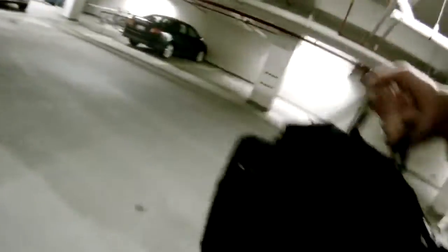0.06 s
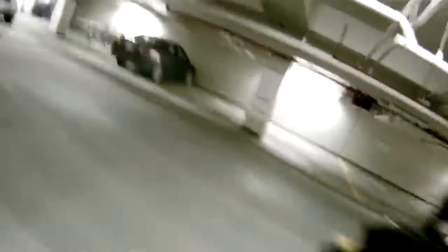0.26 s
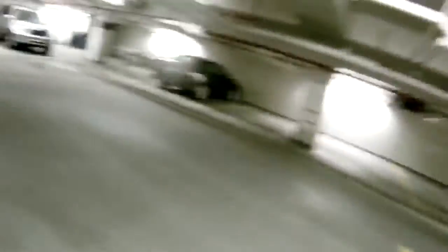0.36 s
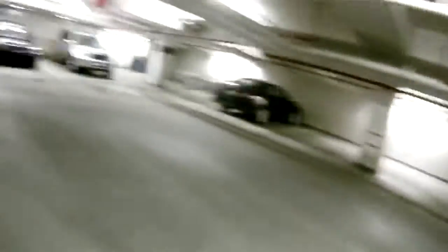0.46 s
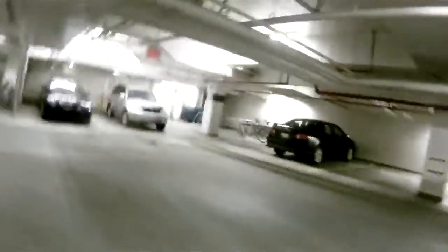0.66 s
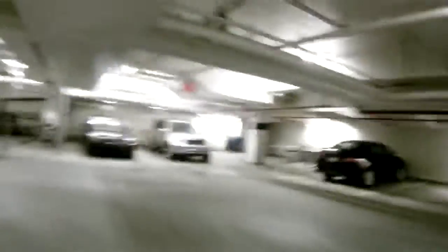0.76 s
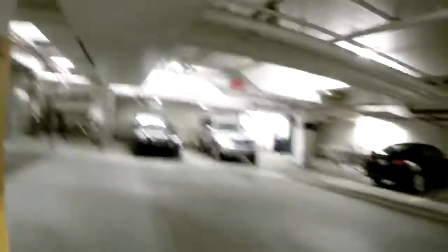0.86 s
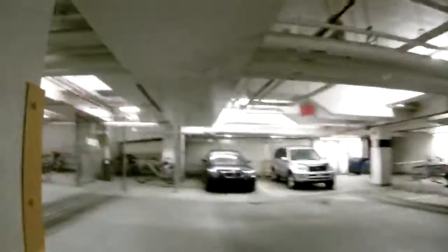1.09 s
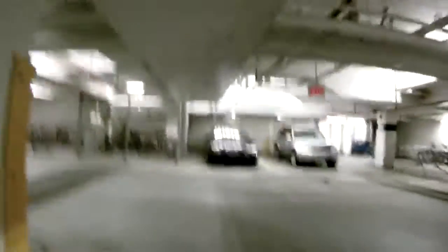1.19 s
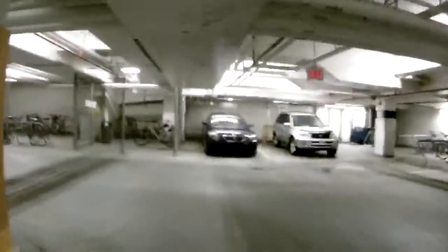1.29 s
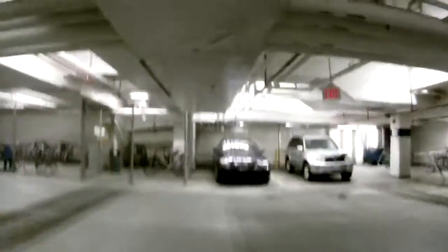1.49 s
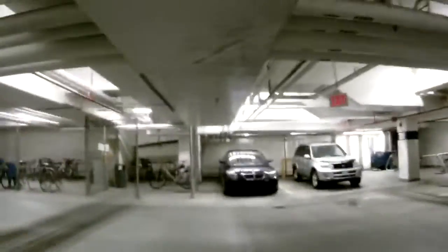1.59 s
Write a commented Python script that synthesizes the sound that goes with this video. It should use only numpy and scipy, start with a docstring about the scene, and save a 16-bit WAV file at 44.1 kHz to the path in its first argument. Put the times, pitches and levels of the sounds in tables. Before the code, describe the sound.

Close handling clicks rattle briefly on a plastic camera case, followed by soft cloth swishes, a few light ticks and a hand rubbing near the microphone. Behind them is the low airy hum of a concrete parking garage.

```python
"""Concrete parking garage: a bag is put aside and a hand-held camera is swung round.
Sharp clicks and small ticks ring the modes of the camera's plastic case. Fabric swishes past,
and a hand rubs the case in stick-slip and bumps it. Ventilation murmurs behind, air noise with
fan tones, and the hall answers the clicks and swishes faintly."""
import sys
import numpy as np
from scipy import signal
from scipy.fft import rfft, irfft, next_fast_len
from scipy.io import wavfile
from scipy.ndimage import map_coordinates

SR = 44100
rng = np.random.default_rng(int(sys.argv[2]) if len(sys.argv) > 2 else 0)


def generate_wav(sig):
    """Save sig (samples, or channels by samples) to the path in sys.argv[1] as 16-bit PCM at SR."""
    pcm = np.round(np.clip(np.atleast_2d(sig).T, -1, 1) * 32767).astype(np.int16)
    wavfile.write(sys.argv[1], SR, pcm)


N = 72765
TIME_S = np.arange(N) / SR

# Case modes: f/Hz, width/Hz, level/dB
CASE_MODES = [(882, 105, -5.5), (1172, 129, -1.5), (1690, 184, -0.5), (2088, 236, 1), (2312, 153, -2),
              (2890, 83, -7.5), (3290, 127, -9), (3680, 190, -17), (4700, 660, -52), (8600, 500, -18.5),
              (9744, 280, -9.5), (14220, 410, -14)]
# Contacts; where each lands sets its drive per band:
# t/s, relative level/dB, knock/dB, hollow/dB, snap/dB, edge/dB, sparkle/dB, ring-time factor, thump/dB
CONTACTS = [ (0.2378, -11.5, 2, 7, -0.5, -16.5, -3.5, 0.76, -24),
            (0.2496, -13, -7.5, -4, 2, -9, -1, 0.72, -15), (0.2526, -19, -8, 7, 8, 0, 2.5, 1.5, -29),
            (0.2930, -10.5, -2, 4, -0.5, 2.5, -1, 1.23, -23), (0.3299, 0, 3, 7, 7, 1.5, 4.5, 1.15, -4.5),
            (0.3627, -12.5, -3, -5, 1, -13, -4, 1, -15), (0.398, -25.5, 16, 8, -1, -22, -3, 1.8, 10),
            (0.4433, 0, 0.5, -4.5, -8.5, -11.5, -6.5, 1.02, -19),
            (0.4483, -2.5, -0.5, 2.5, -7, -9, -6, 0.75, -10),
            (0.4753, -18, 18.5, -2, -2, -21, -5.5, 1.34, -28),
            (0.4818, -25.5, 20.5, 12.5, -6, -22, -3, 1.17, 5), (0.8280, -33.5, 1, 2, -6, -12, -6, 1.4, -16),
            (0.9066, -37.5, 5, 7, 3, -6, -0.5, 1.3, -11), (0.969, -27.5, 2, -3, -10, -23, -9, 1.3497, 0),
            (0.9960, -33, -6, -5, -1, 3, 1, 1.3, -8), (1.4050, -33, 4, 3, -1, -2, -2.5, 1.35, -15),
            (1.4270, -29, 8, -0.5, -9, -10.5, -7, 0.64, 2), (1.4872, -33, 11.5, 10, 11, -2.5, 3, 1.28, 10),
            (1.4920, -27.5, -11, 2, 1, 11, 3, 1.87, -20), ]
CLICK_GAIN_DB, CLICK_FADE_S = 23, 0.047
THUMP_GAIN_DB, THUMP_HZ, THUMP_WIDTH_HZ, THUMP_LOWPASS_HZ = -4, 159, 720, 730
SLIP_DB, SLIP_T60_S, SLIP_HIGHPASS_HZ = -14.5, 0.014, 2130


def case_clicks(size=4096):
    """A sharp push and tiny slips ring the case over a dull thump; each click fades out quickly."""
    out = np.zeros(N + size)
    t, f = np.arange(size) / SR, np.fft.rfftfreq(size, 1 / SR)
    thump_lowpass = minimum_phase(1 / (1 + (f / THUMP_LOWPASS_HZ) ** 2), size)
    thump = resonance(f, THUMP_HZ, THUMP_WIDTH_HZ) * thump_lowpass
    slip_highpass = (1j * f / (SLIP_HIGHPASS_HZ + 1j * f)) ** 2
    fade = np.exp(-(2 * t / CLICK_FADE_S) ** 2)
    for start_s, db, knock, hollow, snap, edge, sparkle, ring, thump_db in CONTACTS:
        slips = amp(SLIP_DB - 60 * t / SLIP_T60_S) * rng.standard_normal(size)
        force = 1 + slip_highpass * rfft(slips)
        mode_power = sum(abs(amp(mode_db) * resonance(f, hz, width_hz / ring)) ** 2
                         for hz, width_hz, mode_db in CASE_MODES)
        drive_hz_db = [(880, knock), (1200, hollow), (1750, 0), (2200, snap),
                       (4200, edge), (7500, edge), (9800, sparkle)]
        case = minimum_phase(np.sqrt(mode_power) * amp(log_interp(drive_hz_db, f)), size)
        click = irfft(force * case + amp(THUMP_GAIN_DB + thump_db) * thump)
        out[round(start_s * SR):][:size] += amp(CLICK_GAIN_DB + db) * fade * click
    return out[:N]


# Cloth swish and drag rumble spectra: f/Hz, relative density/dB
CLOTH_SPECTRUM = [(100, 6.5), (300, -15), (650, -12), (860, 3), (1200, -8.5), (1450, -7.5), (1800, 6),
                  (2100, 2.5), (2450, -4), (3100, 7), (3600, -7), (4100, -5.5), (5200, -24.5),
                  (7000, -22.5), (8200, -11.5), (8900, -2.5), (9500, -14), (10300, -11.5), (11300, -26),
                  (13200, -17), (14000, -24), (14600, -5), (15200, -14)]
DRAG_SPECTRUM = [(40, -15), (100, -1.5), (150, 1), (200, -10), (320, -21), (800, -69)]
# Cloth strokes: start/s, peak/s, end/s, peak level/dB, hiss boost/dB, relative drag/dB
STROKES = [(0.49, 0.506, .60, -43, -9, -23), (0.583, 0.674, 0.73, -42.5, 3.5, -2.5),
           (0.7, 0.766, .82, -36.5, 7, -14), (1.212, 1.259, 1.291, -41.5, 16.5, -30),
           (1.234, 1.303, 1.356, -40.5, 5, -11.5)]
STROKE_FALL_DB = 19.5  # peak to start or end
HISS_HZ, HISS_WIDTH_HZ = 5830, 1240


def fabric_swishes():
    """Cloth drags over the case: each stroke swells and fades, a grainy hiss with a soft rumble."""
    out = np.zeros(N)
    for start_s, peak_s, end_s, db, hiss_db, drag_db in STROKES:
        off_peak = np.maximum((peak_s - TIME_S) / (peak_s - start_s),
                              (TIME_S - peak_s) / (end_s - peak_s))
        hiss = filtered(noise(CLOTH_SPECTRUM), lambda f: amp(hiss_db * bell(f, HISS_HZ, HISS_WIDTH_HZ)))
        swish = stick_slip(hiss) + amp(drag_db) * noise(DRAG_SPECTRUM)
        out += amp(db - STROKE_FALL_DB * off_peak) * swish
    return out


def stick_slip(x, depth_db=2, rate_hz=200):
    """Rubbing surfaces catch and release, so the level flickers; rms 1."""
    return unit_rms(x * amp(depth_db * wobble(rate_hz)))


# Skin-on-plastic and sway spectra: f/Hz, relative density/dB
RUB_SPECTRUM = [(100, -9), (400, -9), (680, -8), (820, -3.5), (1180, 1.5), (1450, -7.5), (1750, 4),
                (2200, -0.5), (2550, -15.5), (3100, -13), (4500, -20), (7500, -23), (9000, -25),
                (10100, -11.5), (11200, -23), (13200, -25), (14000, -11), (15300, -43)]
RUMBLE_SPECTRUM = [(12, -8), (30, 0), (50, -5), (75, -14), (120, -12), (200, -22), (400, -40), (1000, -80)]
# Rub and sway envelopes: t/s, level/dB
RUB_LEVELS = [(0, -74), (.22, -58.5), (.36, -55.5), (.42, -71), (.49, -45.5), (.58, -61.5), (.94, -60.5),
              (1.0, -50), (1.06, -57), (1.095, -45.5), (1.125, -54), (1.21, -70), (1.39, -65), (1.5, -55),
              (1.535, -43), (1.56, -42), (1.6, -41), (1.64, -37)]
RUMBLE_LEVELS = [(0, -59), (.3, -59), (.4, -44), (.45, -41.5), (.5, -51), (.55, -47), (.62, -53), (.7, -63),
                 (.8, -52.5), (.9, -53), (.96, -45), (1.08, -58), (1.3, -51), (1.5, -55.5), (1.65, -65)]


def hand_rub():
    """Skin sticks and slips on the case; the hand's sway rumbles in the microphone."""
    rub = envelope(RUB_LEVELS) * stick_slip(noise(RUB_SPECTRUM))
    rumble = envelope(RUMBLE_LEVELS) * noise(RUMBLE_SPECTRUM)
    return rub + rumble


# Hand and bag bumps: t/s, envelope peak/dB, f/Hz
SOFT_CONTACTS = [(0.244, -49, 44), (0.48, -38, 29.3), (0.689, -35, 50.6), (.762, -37, 121),
                 (0.847, -34, 26.6), (0.951, -37.5, 45)]
SWING_CYCLES = 0.79


def soft_bumps():
    """Each soft contact swings the camera about once."""
    out = np.zeros(N)
    for start_s, db, hz in SOFT_CONTACTS:
        cycles = np.maximum(TIME_S - start_s, 0) * hz
        rise = 2 * cycles / SWING_CYCLES
        out += amp(db) * rise * np.exp(1 - rise) * np.sin(2 * np.pi * cycles)
    return out


# Air noise: f/Hz, relative density/dB
AIR_SPECTRUM = [(30, 8.5), (100, 1.5), (220, -6.5), (330, 1), (480, -3.5), (750, -7), (1000, -3), (1170, 1),
                (1350, -8.5), (1550, -13.5), (2100, -2.5), (2700, -13.5), (3300, -13), (3900, -23),
                (5200, -25.5), (8000, -28.5), (9000, -21.5), (10000, -18), (11300, -22), (13000, -23.5),
                (14200, -21), (15400, -29)]
# Fan tones: f/Hz, level/dB
FAN_TONES = [(220, -65), (355, -72.5), (444, -66.5)]
AIR_DB, FAN_DRIFT_RAD = -51, 0.8


def ventilation():
    """Steady air and microphone hiss, with fan tones drifting in phase."""
    fans = sum(amp(db) * unit_rms(np.sin(2 * np.pi * hz * TIME_S + FAN_DRIFT_RAD * wobble(8)))
               for hz, db in FAN_TONES)
    return amp(AIR_DB) * noise(AIR_SPECTRUM) + fans


# Hall decay: f/Hz, T60/s
HALL_T60, HALL_DB = [(200, 1.1), (2000, 0.4), (10000, 0.31)], -29.5


def hall_reverb(x):
    """Diffuse tail off the concrete; the treble dies first."""
    f, t, bands = signal.stft(rng.standard_normal(N), SR, nperseg=256)
    decay = amp(-60 * t / log_interp(HALL_T60, f)[:, None])
    tail = signal.istft(bands * decay, SR, nperseg=256)[1]
    return amp(HALL_DB) * signal.fftconvolve(x, tail / np.linalg.norm(tail))[:N]


def amp(db):
    """dB to gain."""
    return 10 ** (np.asarray(db) / 20)


def unit_rms(x):
    """Scale to rms 1."""
    return x / np.sqrt(np.mean(x ** 2) + 1e-20)


def log_interp(points, f):
    """Interpolate (f/Hz, value) points on a log axis."""
    hz, values = np.transpose(points)
    return np.interp(np.log(f + 1), np.log(hz + 1), values)


def envelope(points):
    """Gain through (t/s, level/dB) points."""
    return amp(np.interp(TIME_S, *np.transpose(points)))


def wobble(rate_hz):
    """Spline through random knots."""
    return map_coordinates(rng.standard_normal(N // 8), [TIME_S * rate_hz], mode="mirror")


def bell(f, hz, width_hz):
    """Gaussian, peak 1."""
    return np.exp(-((f - hz) / width_hz) ** 2)


def resonance(f, hz, width_hz):
    """Response of one damped mode."""
    return 1j * f * width_hz / (hz * hz - f * f + 1j * f * width_hz)


def minimum_phase(gain, size):
    """Quickest causal response with this gain."""
    cepstrum = irfft(np.log(np.maximum(gain, 1e-6)), size)
    cepstrum[1:size // 2] *= 2
    cepstrum[size // 2 + 1:] = 0
    return np.exp(rfft(cepstrum))


def filtered(x, response):
    """Apply response(f/Hz) by FFT."""
    size = 2 * next_fast_len(N)
    return irfft(rfft(x, size) * response(np.fft.rfftfreq(size, 1 / SR)), size)[:N]


def noise(spectrum):
    """Coloured noise, rms 1."""
    return unit_rms(filtered(rng.standard_normal(N), lambda f: amp(log_interp(spectrum, f))))


def scene():
    """Close handling over the garage background, mono."""
    close = case_clicks() + fabric_swishes()
    return (close + hall_reverb(close) + hand_rub() + soft_bumps() + ventilation())[None]


# Microphone port notches: f/Hz, half width/Hz, gain/dB
MIC_NOTCHES = [(6020, 480, -13), (12000, 700, -15)]
OVERLOAD_FS, CUTOFF_HZ, TAPER_HZ = 0.95, 15600, 400


def record(dry):
    """The microphone port notches the treble, peaks clip at overload, and the band ends steeply."""
    def port(f):
        gain_db = sum(db * bell(f, hz, width_hz) for hz, width_hz, db in MIC_NOTCHES)
        return minimum_phase(amp(gain_db), 2 * (len(f) - 1))

    clipped = np.clip(filtered(dry[0], port), -OVERLOAD_FS, OVERLOAD_FS)
    return filtered(clipped, lambda f: np.clip((CUTOFF_HZ - f) / TAPER_HZ + 0.5, 0, 1))[None]


dry = scene()
out = record(dry)
generate_wav(out)
```